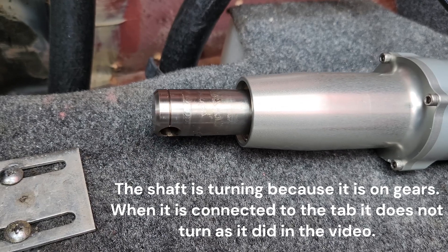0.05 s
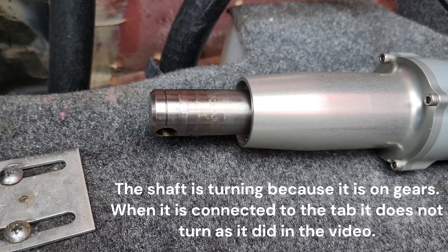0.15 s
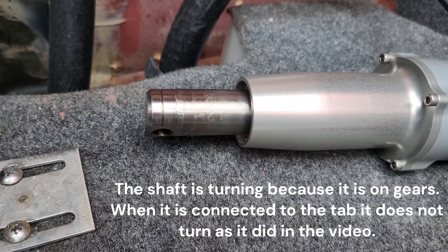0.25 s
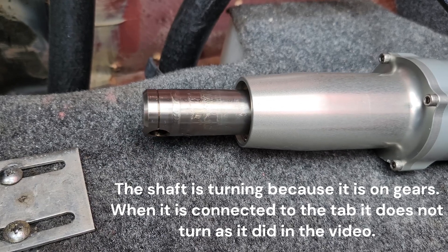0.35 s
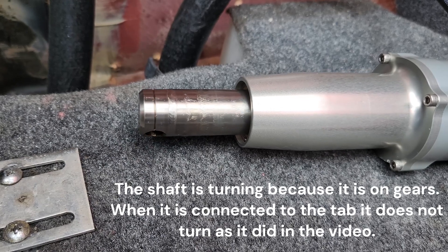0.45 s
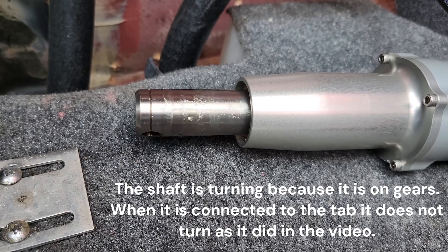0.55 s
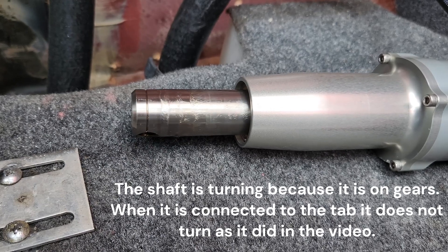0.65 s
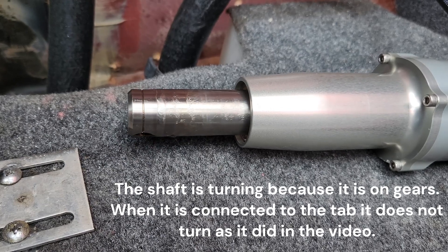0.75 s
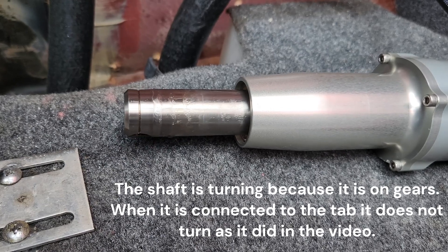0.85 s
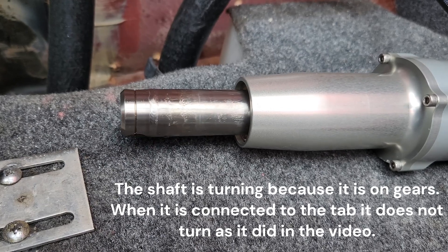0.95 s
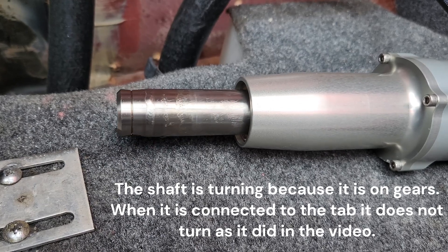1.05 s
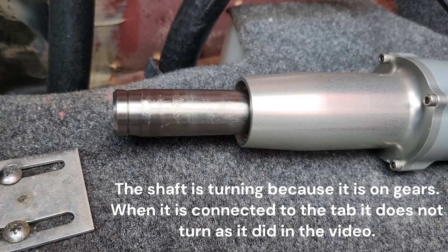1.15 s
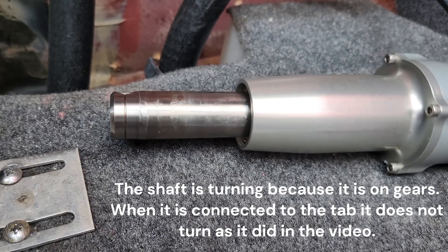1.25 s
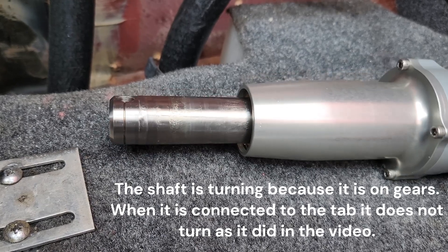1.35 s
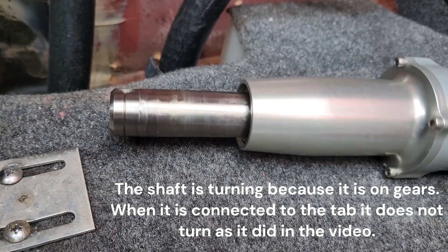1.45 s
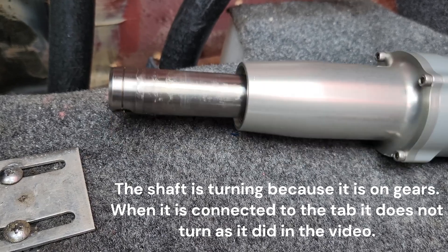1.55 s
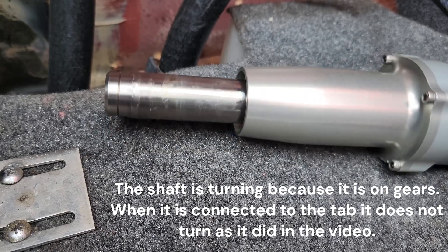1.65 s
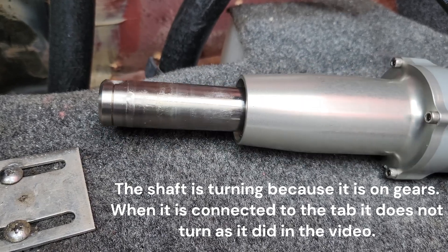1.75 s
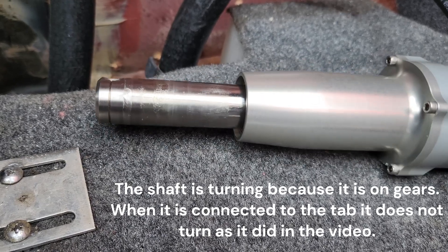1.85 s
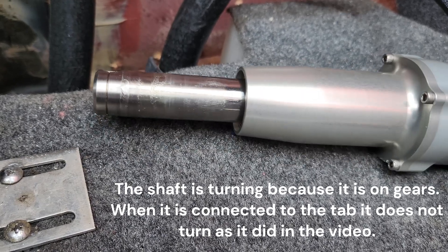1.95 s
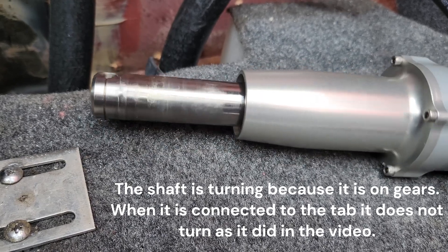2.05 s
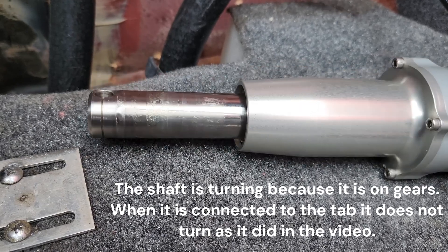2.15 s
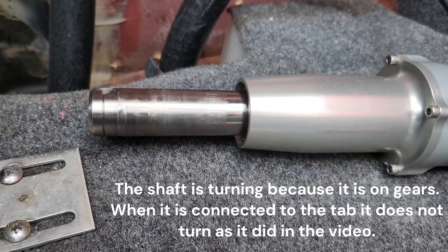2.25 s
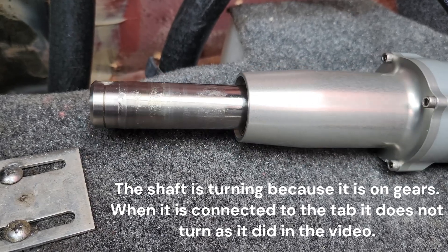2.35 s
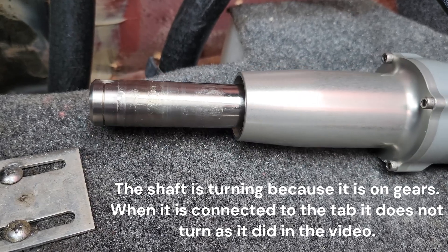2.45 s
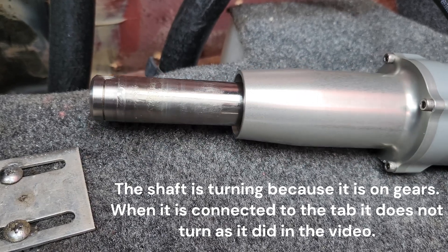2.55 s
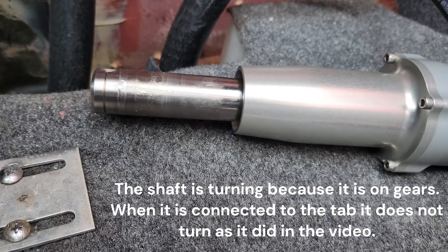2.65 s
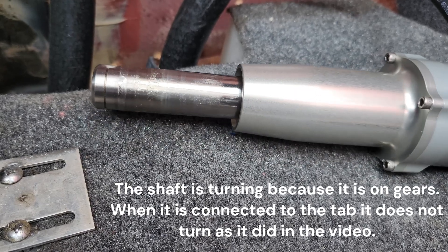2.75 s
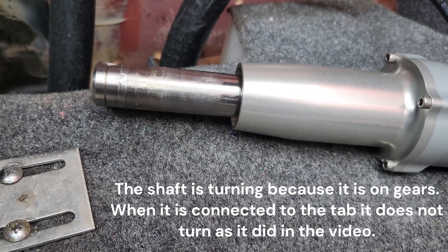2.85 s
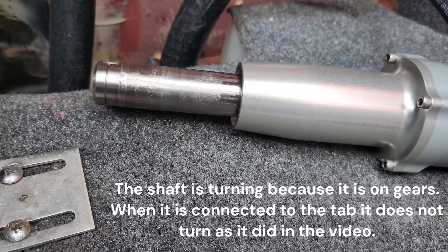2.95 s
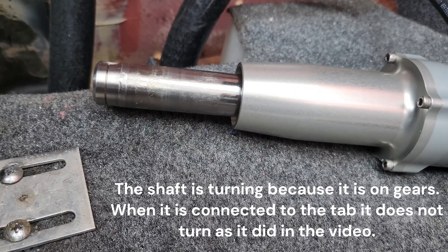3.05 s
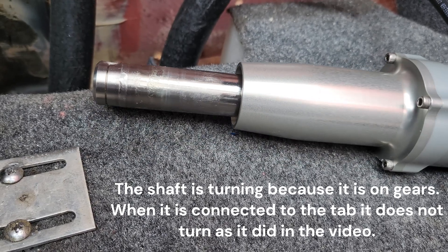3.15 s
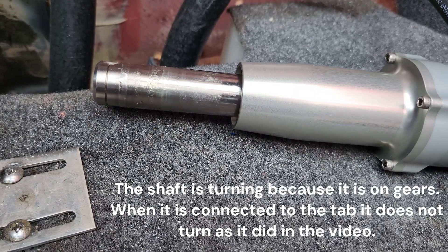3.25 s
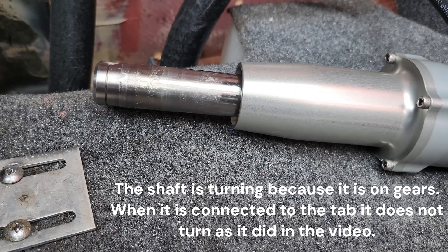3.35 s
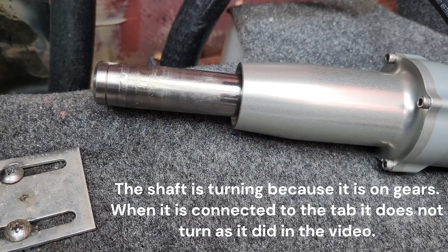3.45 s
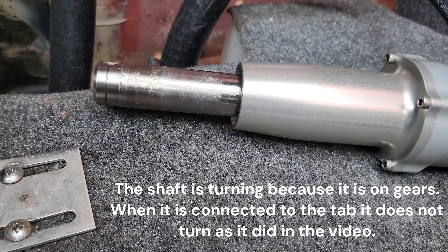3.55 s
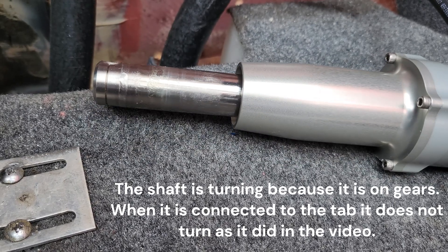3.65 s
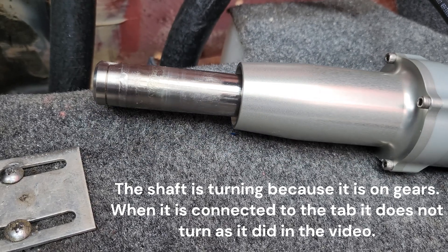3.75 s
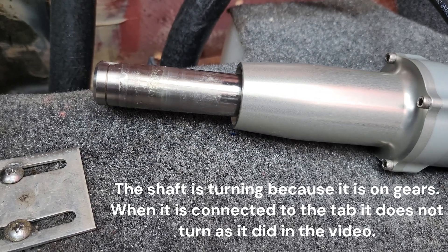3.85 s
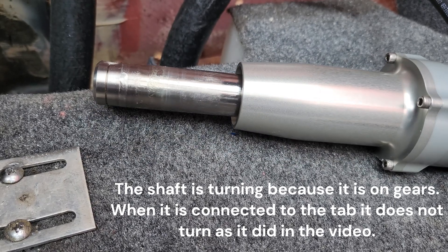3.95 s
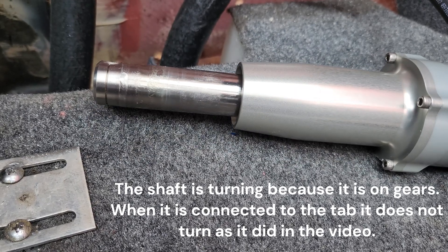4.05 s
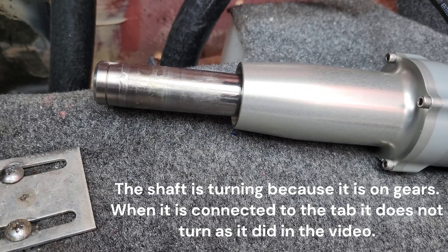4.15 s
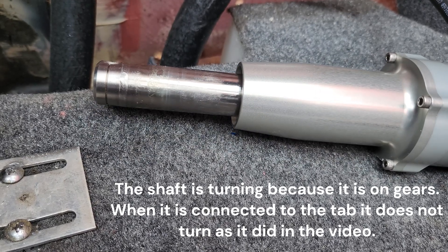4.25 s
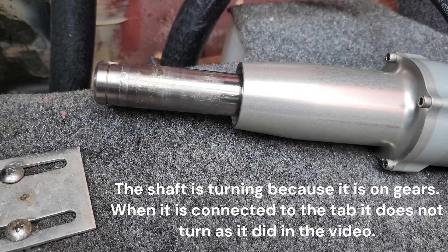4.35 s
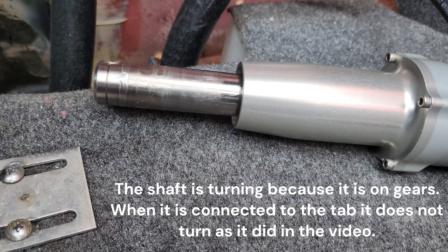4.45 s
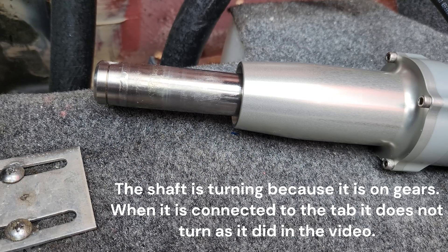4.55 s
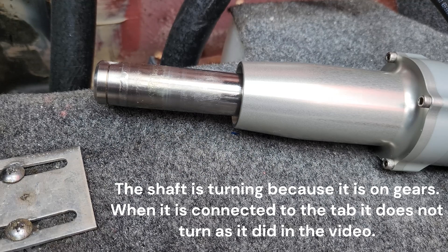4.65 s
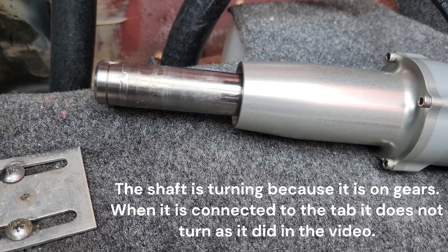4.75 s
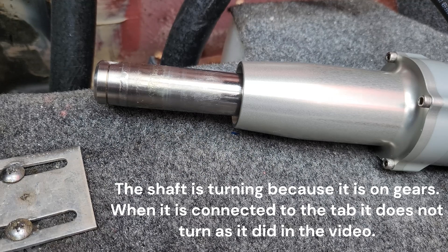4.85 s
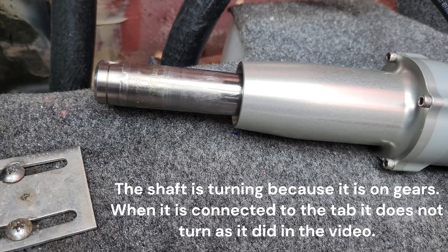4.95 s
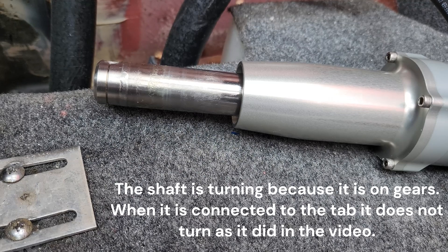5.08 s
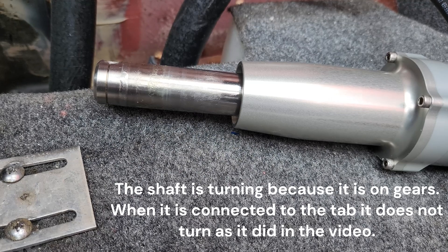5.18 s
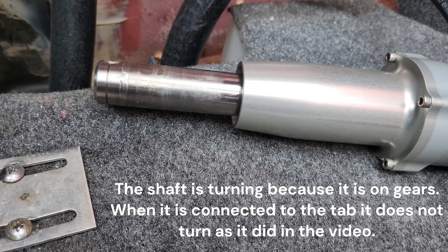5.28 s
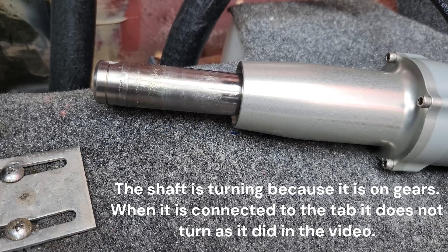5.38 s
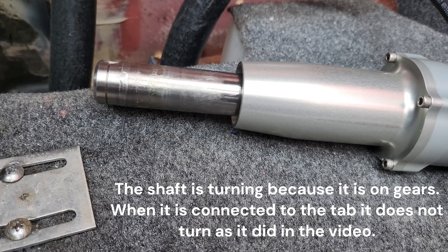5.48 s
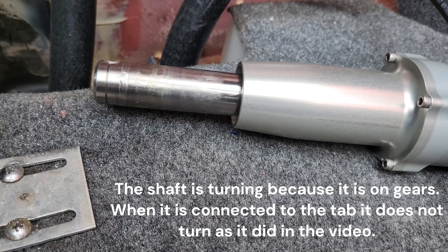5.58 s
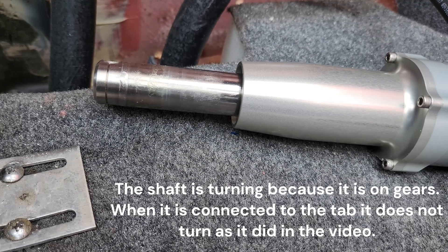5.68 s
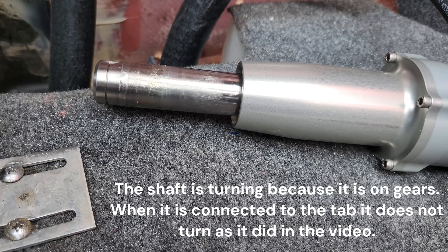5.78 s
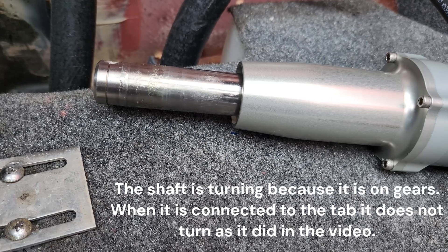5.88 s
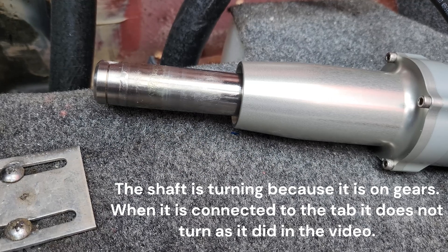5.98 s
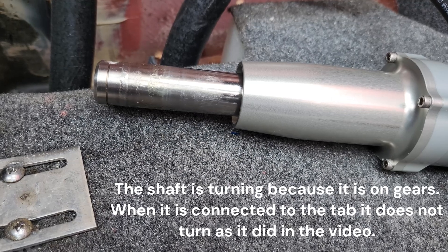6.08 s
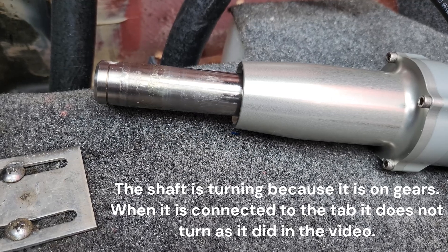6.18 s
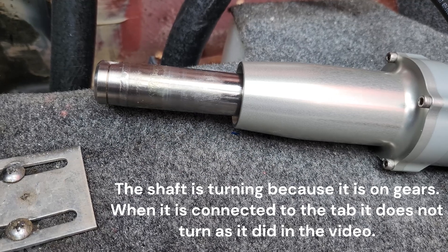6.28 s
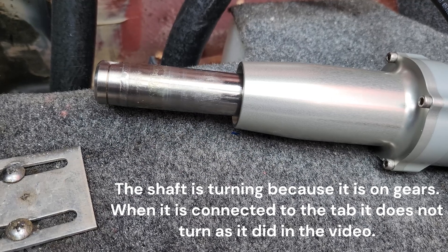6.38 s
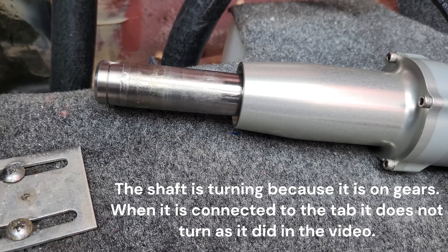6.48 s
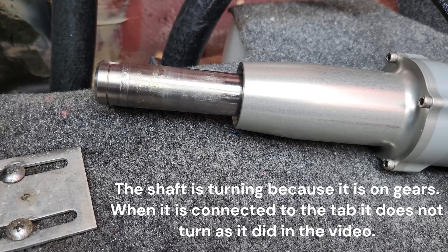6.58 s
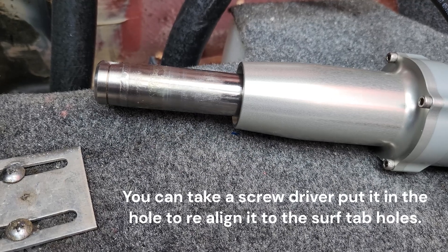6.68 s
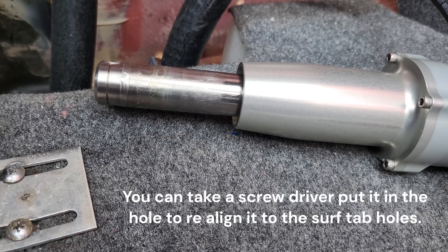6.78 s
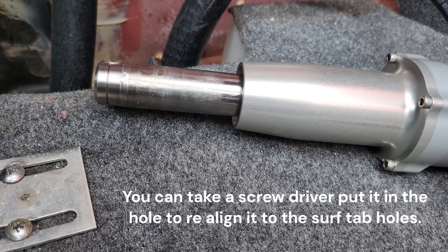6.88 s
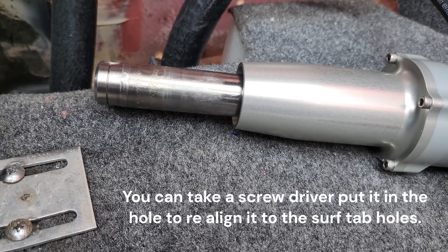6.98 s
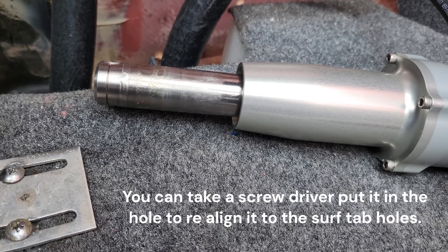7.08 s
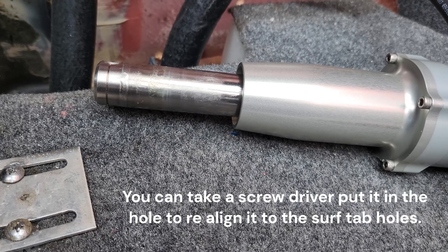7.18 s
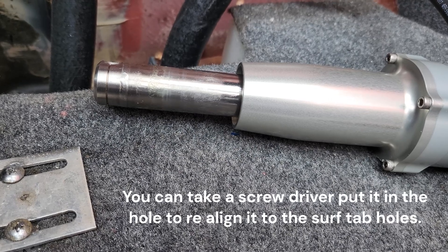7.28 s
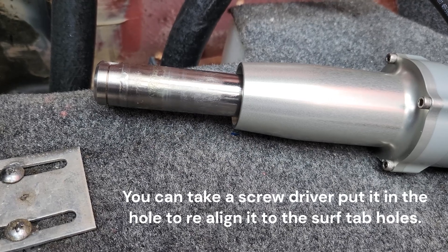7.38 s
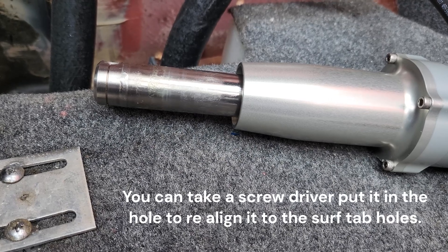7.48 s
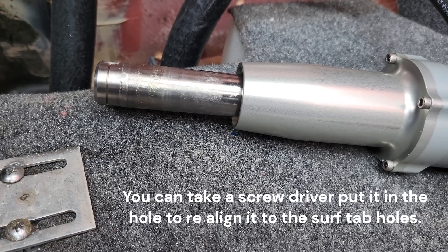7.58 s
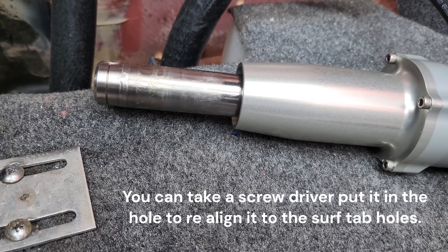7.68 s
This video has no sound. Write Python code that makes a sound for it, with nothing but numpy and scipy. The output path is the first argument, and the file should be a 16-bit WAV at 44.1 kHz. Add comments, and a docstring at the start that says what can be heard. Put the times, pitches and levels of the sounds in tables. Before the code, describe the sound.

A geared electric motor, already running, whines with a bright rattling clatter very near a hand-held phone. It cuts off, pauses a fraction of a second, runs again briefly and stops with a knock. Then the hollow hull is quiet: low rumble, faint hiss, soft thumps, panel creaks, carpet rubs, one sharp tick and far bird chirps.

```python
"""A small motor whines and clatters close by in two runs, with knocks; then come thumps, rubs and far birds.
A geared electric actuator lies on carpet in a hollow hull, near a hand-held phone with two microphone ports.
Tooth noise, partly repeated each gear turn, is coloured by fixed peaks; gear tones and hum follow the speed.
Knocks and thumps are damped modes; panel sounds, rubs, bird rasps, rumble and hiss are shaped noise;
bird whistles are falling sines."""
import sys
import numpy as np
from scipy import signal
from scipy.fft import rfft, irfft
from scipy.io import wavfile
from scipy.ndimage import uniform_filter1d

SR = 44100
rng = np.random.default_rng(int(sys.argv[2]) if len(sys.argv) > 2 else 0)


def voltage_ratio(decibels):
    """Convert decibels (scalar or array-like) to amplitude ratios, 20 dB per decade."""
    exponent = np.asarray(decibels, float) / 20
    return 10 ** exponent


def unload_wav(signal):
    """Save mono or channel-first audio to the path in sys.argv[1] as 16-bit WAV at rate SR, clipped to [-1, 1]."""
    wavfile.write(
        sys.argv[1],
        SR,
        np.round(np.clip(np.atleast_2d(signal).T, -1, 1) * 32767).astype(np.int16),
    )


N = 340452
T = np.arange(N) / SR
HZ = np.maximum(np.arange(N // 2 + 1) * SR / N, 1)
SIDE = np.array([[.5], [-.5]])  # splits a left-minus-right value between the ports

FULL_HZ = 268.8  # rotor hum pitch at full speed
HUMS_PER_TURN = 14  # rotor hum cycles per gear turn
# motor balance between the ports: f/Hz, left minus right/dB
MOTOR_PAN = [(200, 2.5), (700, 0), (1290, 2.5), (1900, -8), (2750, 9.5), (3300, -2.5), (4800, -5),
             (5400, -3), (6400, 8), (7800, 4), (9000, -0.5), (13000, -1), (13900, -6), (15800, -2.5)]


def level(x, db):
    """Set the rms level."""
    return x * voltage_ratio(db) / np.sqrt(np.mean(x ** 2))


def along(table, hz=HZ):
    """Read (Hz, value) points on a log-frequency axis."""
    f, v = np.transpose(table)
    return np.interp(np.log(hz), np.log(f), v)


def resonances(modes, hz=HZ):
    """Gain of (Hz, width Hz, dB) peaks; their powers add."""
    return np.sqrt(sum(voltage_ratio(db) ** 2 / (1 + (2 * (hz - f) / w) ** 2) ** 2 for f, w, db in modes))


def walk(rate_hz):
    """Random levels held 1 / rate_hz s and slewed; spread near 1."""
    k = int(SR / rate_hz)
    held = np.repeat(rng.standard_normal(N // k + 1), k)
    return 1.1 * uniform_filter1d(uniform_filter1d(held, k), k)[:N]


def ports(common, gain, alike, pan_db, lag_s=0, scatter_s=0, unrelated=1):
    """Two ports: a shared sound, later on the left, plus each port's own echoes and unrelated noise; rms 1."""
    shared = rfft(common) * np.exp(-2j * np.pi * HZ * lag_s * SIDE)
    own = np.sqrt(unrelated) * rfft(rng.standard_normal((2, N)))
    if scatter_s:
        echoes = level(rng.standard_normal((2, N)) * np.exp(-np.log(1000) * T / scatter_s), 0)
        own = own + np.sqrt(1 - unrelated) * rfft(common) * rfft(echoes) / np.sqrt(N)
    both = np.sqrt(alike) * shared + np.sqrt(1 - alike) * own
    return level(irfft(both * gain * voltage_ratio(pan_db * SIDE), N), 0)


def ring(s, hz, t60_s, rise_s):
    """A damped mode struck at s."""
    out, i = np.zeros(N), int(s * SR) + 1
    t = T[i:i + int(2 * t60_s * SR)] - s
    envelope = (1 - np.exp(-t / rise_s)) * np.exp(-np.log(1000) * t / t60_s)
    out[i:i + len(t)] = envelope * np.sin(2 * np.pi * hz * t)
    return out


def swell(t, rise_s, fall_s):
    """Rounded rise to t = 0, then an exponential decay."""
    return np.exp(-np.where(t < 0, (t / rise_s) ** 2, t / fall_s))


def drive(on_s, off_s):
    """One run: the rotor jumps to part speed, closes the gap, then coasts; returns pitch/Hz and lost level/dB."""
    # stages of the run-down, which add up: t after the switch/s, added loss rate/(dB/s)
    run_down = [(0, 140.5), (0.027, 170), (.105, 347), (.15, -400)]
    jump_share, spin_up_s, spin_up_bend, coast_s = .43, .072, 1.33, .15
    bite_s, bite_db, fill_s = 0.014, 11.5, 0.03535  # clatter bites still bite_db short, then fills in
    jolt_db, jolt_s = 5, .004  # the drive jolts as the current is cut
    up, down = np.maximum(T - on_s, 0), np.maximum(T - off_s, 0)
    gap = (1 - jump_share) * np.exp(-(up / spin_up_s) ** spin_up_bend)
    hz = FULL_HZ * (1 - gap) * np.exp(-down / coast_s)
    lost_db = bite_db * np.exp(-up / fill_s) - 20 * np.log10(np.clip(up / bite_s, 1e-4, 1) ** 2)
    lost_db = lost_db - jolt_db * np.exp(-((T - off_s) / jolt_s) ** 2)
    return hz, lost_db + sum(rate * np.maximum(down - s, 0) for s, rate in run_down)


def tooth_clatter(turns, rotor, lost_db):
    """Tooth noise, partly repeated each gear turn, throbs with the load and is coloured by fixed peaks."""
    # broad clatter spectrum: f/Hz, relative density/dB
    clatter_shape = [(90, -38.5), (130, -14), (200, -19), (370, -27.5), (520, -17.5), (720, -20.5),
                     (1170, -10), (1450, -9.5), (2180, -14), (6730, -14.5), (7400, -13), (8500, -8.5),
                     (9300, -18), (10500, -20.5), (13400, -23), (14300, -13.5), (15000, -16.5),
                     (15800, -23)]
    # housing resonances, and narrow noise bands at high rotor harmonics (7257, 7795, 8062, 8605 Hz):
    # f/Hz, width/Hz, relative level/dB
    clatter_peaks = [(1060, 90, -9), (1155, 54, 0), (1250, 70, -7), (1680, 150, -14), (1920, 60, -14),
                     (3460, 29, -13), (4410, 25, -15), (4680, 200, -13), (5610, 41, -15), (5980, 91, -13),
                     (6340, 70, -7), (7090, 130, -12), (7257, 25, -13), (7795, 26, -4), (7910, 60, -10),
                     (8062, 22, 1), (8370, 57, -13), (8605, 50, -8), (9440, 62, -19), (10500, 230, -22),
                     (12700, 55, -22), (13900, 190, -14), (14350, 130, -9), (15650, 85, -14)]
    # f/Hz, power share that comes straight rather than scattered
    motor_alike = [(200, .93), (600, 0.32), (1200, 0.94), (2000, 0.47), (4000, 0.24), (16000, .2)]
    repeat, cells = .15, 2294  # power share that repeats; noise cells per gear turn
    peak_sag = .3  # dB the peaks fall for each dB of clatter lost
    # the same worn teeth meet again on every turn
    wear = rng.standard_normal(cells)[(turns % 1 * cells).astype(int)]
    teeth = np.sqrt(repeat) * wear + np.sqrt(1 - repeat) * rng.standard_normal(N)
    x = ports(teeth, 1, along(motor_alike), along(MOTOR_PAN), lag_s=0.00013, scatter_s=0.093, unrelated=0.53)
    # the load throbs with the rotor and by chance before the peaks colour it
    x = x * voltage_ratio(1.0 * np.sin(rotor) + 0.99 * walk(150))
    plain_gain = voltage_ratio(along(clatter_shape))
    peaked_gain = np.hypot(plain_gain, voltage_ratio(1.5) * resonances(clatter_peaks))
    plain = irfft(rfft(x) * plain_gain, N)
    peaked = irfft(rfft(x) * peaked_gain, N)
    mixed = plain + (peaked - plain) * voltage_ratio(-peak_sag * np.maximum(lost_db, 0))
    return mixed * voltage_ratio(2.3) / np.std(peaked)


def gear_tones(turns, hz):
    """Slot and tooth tones locked to the gear turn, strongest at full speed; own phase at each port."""
    # tone orders: cycles per gear turn
    teeth_cycles = [48, 60, 62, 87, 100, 121, 140, 161, 180, 210, 230, 292, 330, 378, 406, 420, 448]
    # same tones: level relative to the clatter/dB, wander/dB
    teeth_levels = [(-28, 2), (-14.5, 0.5), (-15, 1), (-25, 1), (-29, 3), (-27, 1), (-23.5, 3), (-28, 3),
                    (-15.5, 2.5), (-23, 3), (-25, 1.5), (-27, 3), (-25, 3), (-26, 3), (-25, 3), (-16.5, 3),
                    (-23, 3)]
    locked, out = np.abs(hz / FULL_HZ) ** 1.5, 0
    for cycles, (db, wander_db) in zip(teeth_cycles, teeth_levels):
        offset = rng.random((2, 1)) * min(cycles / 300, 1)
        phase = 2 * np.pi * (cycles * turns + offset) + .4 * walk(30)
        pan_db = along(MOTOR_PAN, cycles * FULL_HZ / HUMS_PER_TURN) * SIDE
        out = out + np.sqrt(2) * voltage_ratio(db + pan_db + wander_db * walk(25)) * locked * np.sin(phase)
    return out


def low_housing_ring(x, turns, lost_db):
    """The heavy low ring throbs six times a gear turn and outlasts the treble in the run-down."""
    low = irfft(rfft(x) * resonances([(1150, 700, -1.5), (750, 780, 0.5)]), N)
    throb_db = 2.1 * np.sin(2 * np.pi * 6 * turns)
    return x + low * (voltage_ratio(throb_db + 0.47 * np.clip(lost_db, 0, 40)) - 1)


def rotor_hum(rotor, hum_db, octave_db):
    """Rotor fundamental and octave, a little stronger on the left."""
    hum = voltage_ratio(hum_db + 0.88 * walk(9)) * np.sin(rotor)
    hum = hum + voltage_ratio(octave_db + 1.5 * walk(12)) * np.sin(2 * rotor)
    return np.sqrt(2) * hum * voltage_ratio(np.array([[.6], [-.4]]))


def motor():
    """Two runs: one speed drives clatter, gear tones and hum."""
    # t on/s, t off/s, then full-speed levels before later trims: clatter/dB, hum/dB, hum octave/dB
    runs = [(-1, 1.188, -28.5, -42, -53), (1.421, 1.9865, -28.5, -53, -55.5)]
    sag = [1, 1.5, 1.3]  # dB that clatter, hum and octave lose for each dB of clatter lost
    run = np.maximum(np.searchsorted([r[0] for r in runs], T) - 1, 0)
    hz, lost_db = (np.choose(run, c) for c in zip(*(drive(*r[:2]) for r in runs)))
    full_db = np.array(runs)[run, 2:].T
    clatter_db, hum_db, octave_db = full_db - np.outer(sag, lost_db)
    hz = hz + .25 * walk(6)
    turns = np.cumsum(hz) / SR / HUMS_PER_TURN
    rotor = 2 * np.pi * HUMS_PER_TURN * turns
    gears = tooth_clatter(turns, rotor, lost_db) + gear_tones(turns, hz)
    gears = low_housing_ring(gears, turns, lost_db)
    return voltage_ratio(clatter_db) * gears + rotor_hum(rotor, hum_db, octave_db)


def knocks():
    """Backlash in the drive: each blow rings the same short modes, most those near its own centre."""
    # t/s, relative level/dB, centre of the blow's spectrum f/Hz, loss an octave away/dB
    blows = [(1.196, -29, 222, 24.5), (1.211, -24, 900, 26), (1.227, -27.5, 560, 30),
             (1.432, -35, 1150, 27), (1.698, -23, 700, 23), (1.981, -29, 175, 31),
             (1.982, -23.5, 1200, 16.5), (2.0356, -11, 1050, 15)]
    # f/Hz, relative level/dB, t60/s
    knock_modes = [(169, -3.5, 0.11), (230, -6, 0.026), (528.4, -11, 0.013), (700, -6.5, 0.03),
                   (900, -8.5, 0.02), (1050, -1, .012), (1200, 3, .016), (1411, -5.5, .012),
                   (1700, -8, .012), (2600, -0.5, 0.019)]
    out = sum(voltage_ratio(db + mode_db - slope_db * np.log2(hz / centre_hz) ** 2) * ring(s, hz, t60_s, 0.0014)
              for s, db, centre_hz, slope_db in blows for hz, mode_db, t60_s in knock_modes)
    return np.array([voltage_ratio(5.5) * np.roll(out, 4), voltage_ratio(2.9) * out])  # left lags 4 samples


def thumps():
    """Weight shifting on the floor strikes low hull modes, those near the blow's centre most."""
    # t/s, relative level/dB, centre of the blow's spectrum f/Hz
    blows = [(0.498, -27, 62), (0.521, -20.5, 104), (.83, -21.5, 104), (0.848, -30, 70), (1.001, -29, 104),
             (2.05, -33, 75), (3.25, -33, 70), (3.634, -33.5, 70), (3.862, -21.5, 96.2), (3.911, -27, 100),
             (3.92, -26.5, 60), (4.219, -34.5, 49.4), (4.301, -28.5, 104), (4.775, -29.5, 52),
             (4.802, -17, 52), (4.884, -16.5, 69), (5.422, -31.5, 52), (5.538, -28, 104),
             (5.572, -26.5, 60), (5.66, -33, 104), (5.834, -32, 70), (7.501, -35.5, 52), (7.622, -33, 53.6)]
    # f/Hz, relative level/dB, t60/s
    thump_modes = [(52, 2, 0.46), (61, -1, 0.18), (70, 1, .11), (104, 0.5, .13)]
    out = sum(voltage_ratio(db + mode_db - 90 * np.log2(hz / centre_hz) ** 2) * ring(s, hz, t60_s, 0.0092)
              for s, db, centre_hz in blows for hz, mode_db, t60_s in thump_modes)
    return out * voltage_ratio(np.array([[.7], [-.7]]))


def panels():
    """Panels creak and boom, and ring on after each motor stop: swells of noise through broad modes."""
    # t peak/s, decay/s, level before wander/dB, extra in the two lowest modes/dB
    swell_table = [(1.33, .05, -72, 0), (2.118, 0.087, -69, 0), (2.4, .015, -72, 0), (2.61, 0.04, -81, 0),
                   (2.94, 0.035, -74, -3), (3.269, 0.018, -54.5, 0), (3.376, .015, -58.5, -4),
                   (3.66, 0.096, -71, 0), (3.878, 0.028, -52, 4), (3.94, 0.057, -61, 4),
                   (4.06, 0.035, -59.5, -6), (4.32, .018, -59.5, 3), (4.523, 0.055, -61, -3),
                   (4.62, 0.034, -60, 2), (4.81, 0.034, -50.5, 3), (4.91, 0.03, -54, 0),
                   (5.005, .012, -72, -5), (5.193, .02, -64, -4), (5.29, .035, -63, 5),
                   (5.44, 0.032, -64, 2), (5.58, .04, -59, 0), (5.65, .04, -60, 6), (5.72, 0.033, -56, -2),
                   (5.79, .025, -64, -3), (5.92, 0.046, -74, -4), (6.031, 0.016, -62.5, -2),
                   (6.37, .06, -83, 0), (6.958, 0.011, -71.5, 0), (7.404, .015, -75, 0)]
    # f/Hz, width/Hz, relative level/dB
    panel_modes = [(165, 45, -0.5), (251.5, 30, -0.5), (367, 50, 1.5), (417, 40, -3.5), (467, 32, -1.5),
                   (700, 810, -25.5)]
    rise_share, rest_db = 0.86, -92  # rise / decay; mean level between swells
    whole = np.linalg.norm(resonances(panel_modes))
    bands = []
    for modes in (panel_modes[:2], panel_modes[2:]):
        gain = resonances(modes)
        share = np.linalg.norm(gain) / whole
        bands.append(ports(rng.standard_normal(N), gain, 0.7, 1.2) * share)
    swells = sum(voltage_ratio(db + np.array([[low_db], [0]])) * swell(T - s, rise_share * fall_s, fall_s)
                 for s, fall_s, db, low_db in swell_table)
    swells = swells * voltage_ratio(1.5 * walk(40)) + voltage_ratio(rest_db + 4 * walk(15))
    return bands[0] * swells[0] + bands[1] * swells[1]


def rubs_rasps_and_ticks():
    """Carpet rubs, late bird rasps near 4 kHz and sharp ticks: swells of grainy noise, each with its band."""
    # carpet rubs, and near 4 kHz the rasp of bird chirps (6.37, 6.602, 7.422 s); then the ticks
    # both tables: t peak/s, decay/s, rms before the swell/dB, centre f/Hz, width/octaves
    rub_and_rasp_table = [(3.282, 0.016, -56.5, 1500, 2.2), (3.365, 0.025, -70, 800, 1.5),
                          (3.6, .06, -84, 1200, .1), (3.77, .08, -79, 1200, 0.08),
                          (3.876, 0.032, -61.5, 1300, 6), (4.144, 0.022, -72.5, 12300, 1.4),
                          (4.245, 0.021, -67, 1900, 0.83), (4.265, .028, -72, 1250, .3),
                          (4.31, 0.016, -64.5, 700, 0.53), (4.322, 0.039, -70, 5000, 1.7),
                          (4.7, .022, -76, 9000, 1.4), (4.84, 0.043, -65.5, 12000, 1.1),
                          (4.878, 0.026, -56, 9000, 3.6), (4.89, 0.019, -61.5, 1240, 0.48),
                          (4.924, 0.021, -60.5, 9000, 1.9), (5.003, 0.033, -70, 9030, 1.24),
                          (5.319, 0.023, -69.5, 7950, 1.7), (5.437, 0.023, -69.5, 1510, 1.7),
                          (5.65, .09, -65, 2500, 1.1), (5.68, 0.087, -74, 8000, .55),
                          (5.7, .09, -74, 1150, .15), (5.75, 0.05, -70, 2600, 1.1),
                          (6.05, .08, -78, 2400, 1.1), (6.37, 0.034, -78, 3950, 0.42),
                          (6.602, 0.03, -74, 4000, 0.77), (7.422, 0.03, -69, 3800, 0.46)]
    tick_table = [(3.268, 0.0061, -39, 4000, 1.9), (4.801, 0.028, -55.5, 3980, 1.3),
                  (6.704, 0.014, -63.5, 4230, 0.64)]
    # f/Hz, relative density/dB
    grain_colour = [(300, -49.5), (500, 15), (1250, 10), (2000, 8), (5500, 1.5), (8000, 7), (9000, -2),
                    (10000, -6), (11500, 3), (15800, 1)]
    rub_rise, tick_rise = 0.78, 0.29  # rise / decay
    noise = ports(rng.standard_normal(N), voltage_ratio(along(grain_colour)), 0.27, 2.4)
    noise = voltage_ratio(2.0 * walk(400) + 1.0 * walk(80)) * noise
    out, span = np.zeros((2, N + SR)), SR // 2
    hz = np.maximum(np.arange(span // 2 + 1) * SR / span, 1)
    events = [(rub_rise, *r) for r in rub_and_rasp_table] + [(tick_rise, *r) for r in tick_table]
    for rise_share, s, fall_s, db, centre_hz, octaves in events:
        i = int(s * SR) - span // 2
        t = T[i:i + span] - s
        band = voltage_ratio(-6 * (np.log2(hz / centre_hz) / octaves) ** 2)
        grain = level(irfft(rfft(noise[:, i:i + span]) * band, span), db)
        out[:, i:i + span] += grain * swell(t, rise_share * fall_s, fall_s)
    return out[:, :N]


def birds():
    """Far chirps: falling, slightly rough whistles, some with an upper voice, smeared by distance."""
    # t/s, length/s, first f/Hz, level before roughness and echo/dB, same for the upper voice/dB (-99: unheard)
    chirps = [(2.19, 0.035, 2900, -83, -99), (2.268, 0.056, 3530, -87, -99), (2.45, .045, 2800, -87, -99),
              (3.038, 0.03, 3600, -75, -95), (3.104, .035, 3600, -77, -95), (3.54, 0.038, 3660, -87, -83),
              (3.686, 0.032, 3390, -85, -99), (3.771, 0.056, 3450, -76, -94.5),
              (4.182, 0.025, 3640, -81, -99), (4.42, .04, 3400, -85, -99), (5.225, .03, 3250, -79, -99),
              (5.245, .03, 3650, -81, -78.5), (5.259, 0.03, 2890, -77.5, -94),
              (5.42, .06, 3720, -73, -80.5), (5.497, 0.046, 3860, -71.5, -90),
              (6.118, 0.037, 3920, -79.5, -95), (6.327, 0.024, 2840, -78, -96),
              (6.343, 0.037, 3900, -76, -80), (6.386, .03, 3880, -78, -83), (6.6, 0.025, 2200, -82, -99),
              (6.625, 0.03, 2250, -80, -99), (6.599, 0.031, 3660, -78.5, -88.5),
              (6.858, 0.034, 3900, -72.5, -78), (7.05, 0.055, 3660, -81, -92),
              (7.216, 0.032, 3500, -81, -99), (7.27, .05, 3250, -84, -99), (7.372, 0.034, 3650, -74, -90),
              (7.411, 0.066, 4140, -76, -79)]
    fall_hz_per_s, upper_ratio = 5500, 1.19  # slide of the lower voice; pitch ratio of the upper
    straight, flutter, rasp = 0, walk(200), voltage_ratio(2.2 * walk(200))
    for s, length_s, first_hz, db, upper_db in chirps:
        u = np.clip((T - s) / length_s, 0, 1)
        phase = 2 * np.pi * length_s * (first_hz * u - fall_hz_per_s * length_s * u ** 2 / 2)
        lower = voltage_ratio(db) * np.sin(phase + 1.9 * flutter)
        upper = voltage_ratio(upper_db) * np.sin(upper_ratio * phase + 1.7 * flutter)
        straight = straight + np.sqrt(2) * np.sin(np.pi * u) * rasp * (lower + upper)
    t = T[:SR // 5]
    echoes = rng.standard_normal((2, len(t))) * np.exp(-np.log(1000) * t / 0.21)
    echoes = echoes / np.sqrt(np.sum(echoes[0] ** 2))
    return straight + voltage_ratio(-2.0) * signal.fftconvolve(straight[None], echoes, axes=1)[:, :N]


def rumble():
    """Low hull rumble: noise through low modes, nearly the same at both ports."""
    # t/s, level before wander/dB
    rumble_levels = [(0.0, -45), (0.36, -44), (0.84, -41), (1.46, -46.5), (2.58, -48), (2.97, -45.5),
                     (3.59, -47.5), (3.83, -43), (4.04, -45), (4.77, -41), (5.25, -45), (5.48, -43),
                     (6.66, -46.5), (6.99, -47), (7.37, -48.5), (7.72, -40.5)]
    # f/Hz, width/Hz, relative level/dB
    rumble_modes = [(36.2, 16, -11), (52, 8.9, -0.5), (75, 12, -0.5), (101.6, 25, -9.5), (152, 29, -27.5)]
    noise = ports(rng.standard_normal(N), resonances(rumble_modes), 0.98, 1.2)
    return noise * voltage_ratio(np.interp(T, *np.transpose(rumble_levels)) + 1.5 * walk(9))


def hiss():
    """Faint coloured noise, mostly unrelated at the two ports."""
    # f/Hz, relative density/dB
    hiss_colour = [(120, -31.5), (200, -2), (283, -8.5), (456, -9.5), (538, -13), (968, -19), (1650, -20.5),
                   (1770, -22.5), (3310, -20.5), (5940, -27.5), (7830, -14.5), (8580, -21), (9230, -45.5),
                   (11500, -23), (16000, -30.5)]
    noise = ports(rng.standard_normal(N), voltage_ratio(along(hiss_colour)), 0.22, .5)
    return voltage_ratio(-76 + .8 * walk(0.95)) * noise


def drone():
    """A faint far tone under the hiss: noise in one narrow band at 504 Hz."""
    noise = ports(rng.standard_normal(N), resonances([(504, 8, 0)]), 0.32, 0.89)
    return voltage_ratio(-88 + 1.4 * walk(1.5)) * noise


def scene():
    """Everything as it reaches the two ports."""
    near = motor() + knocks() + thumps() + panels() + rubs_rasps_and_ticks()
    return near + birds() + rumble() + hiss() + drone()


def top_cut(x):
    """Nothing passes above the cut-off."""
    return signal.sosfilt(signal.butter(12, 16890, fs=SR, output="sos"), x)


def record(dry):
    """The phone cuts the top with a steep low-pass at 15740 Hz."""
    low_pass = signal.ellip(10, .3, 70, 15740, fs=SR, output="sos")
    mix = signal.sosfilt(low_pass, dry)
    return top_cut(mix)


dry = scene()
out = record(dry)
unload_wav(out)
```